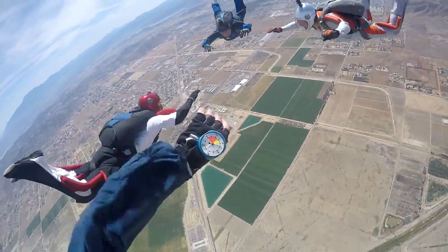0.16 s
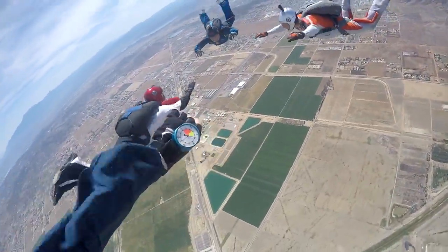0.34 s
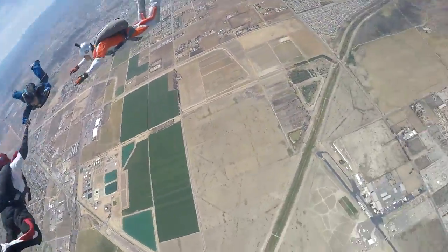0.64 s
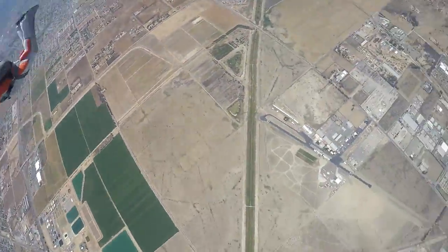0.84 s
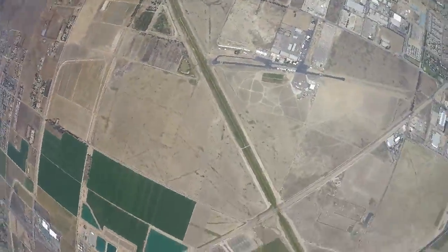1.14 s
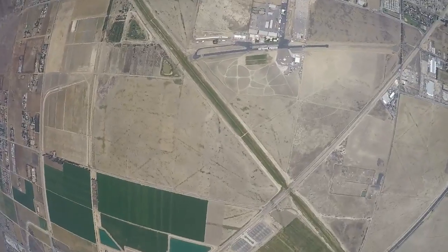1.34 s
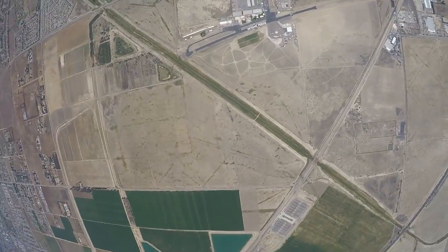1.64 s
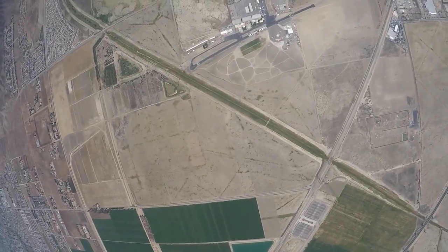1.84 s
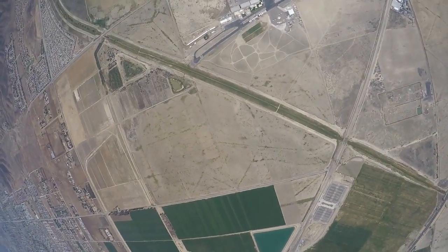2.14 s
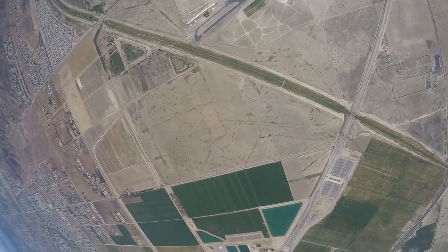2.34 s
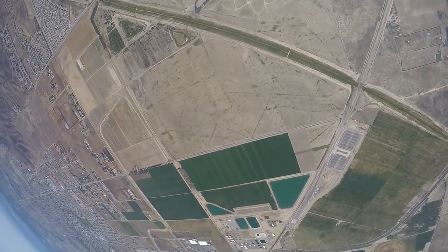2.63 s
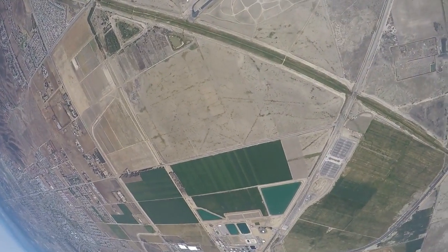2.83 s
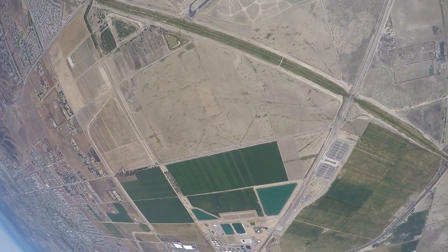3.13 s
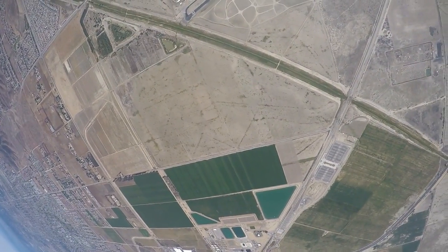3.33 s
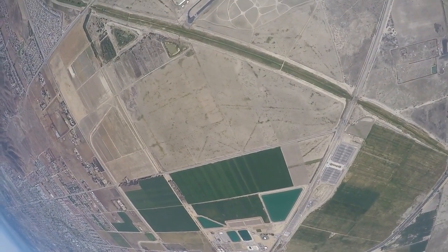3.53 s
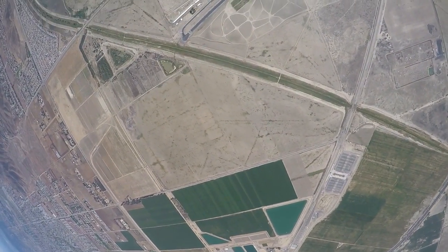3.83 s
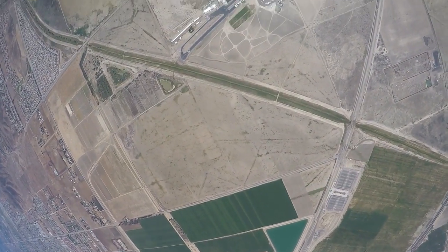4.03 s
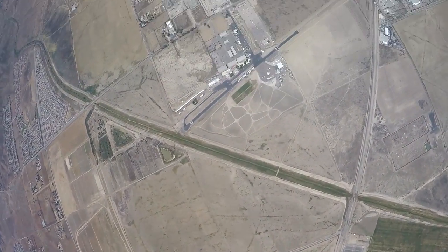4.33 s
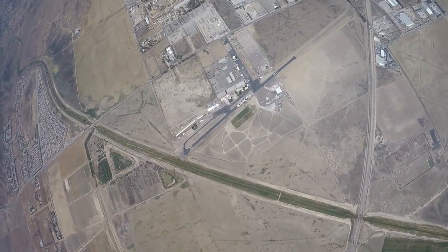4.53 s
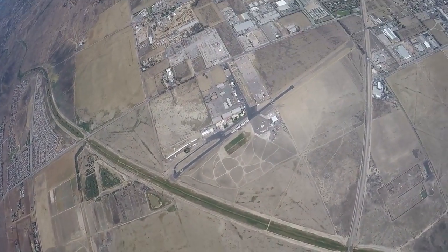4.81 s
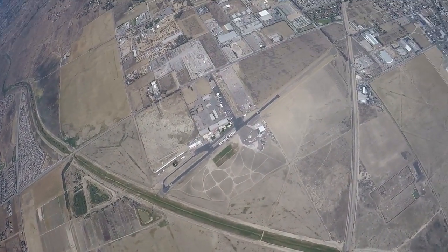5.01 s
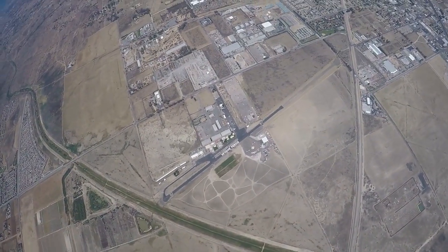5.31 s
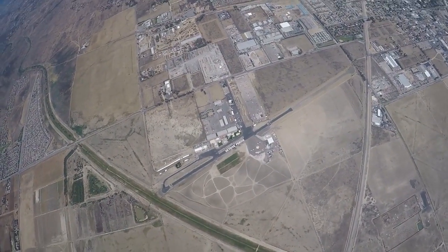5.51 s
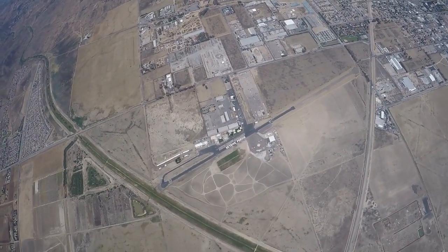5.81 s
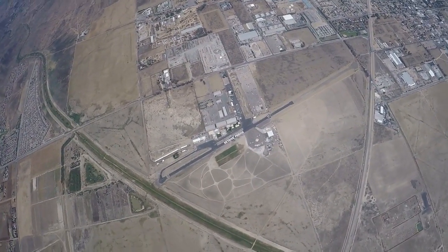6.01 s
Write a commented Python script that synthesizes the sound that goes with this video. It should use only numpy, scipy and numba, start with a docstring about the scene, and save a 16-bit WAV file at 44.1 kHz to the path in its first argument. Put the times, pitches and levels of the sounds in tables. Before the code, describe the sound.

Free-fall wind, heard from a microphone on a skydiver's helmet, starts rough and gusty and settles into a continuous rush. Low rumble and thudding swell and fade beneath an airy, whistling whine that sinks slightly in pitch, with bright hiss on top. A faint thin whistle slips by early, and one short low slap of air hits the microphone just before the end.

```python
"""Free fall from a helmet camera

Air tears past. Big eddies buffet the microphone port under a dull roar. The flow sings in two cavities
of the housing, the lower one sinking as the head tips, and a fine hiss takes its colour from the
housing's higher modes. A thin edge tone slips by early on; near the end one eddy slaps the port."""
import sys
import numpy as np
from scipy import signal
from scipy.fft import rfft, irfft, next_fast_len
from scipy.io import wavfile
from numba import njit

SR = 44100
rng = np.random.default_rng(int(sys.argv[2]) if len(sys.argv) > 2 else 0)


def put_to_file(sound):
    """Save the sound as 16-bit audio at rate SR, in the file named by the first command-line argument."""
    columns = np.atleast_2d(sound).T  # one column per channel
    safe = np.clip(columns, -1, 1)
    whole_steps = np.round(safe * 32767)
    wavfile.write(sys.argv[1], SR, whole_steps.astype(np.int16))


N = 271656

# how unsteady the flow is, wild in another body's wake: (time [s], gust depth [dB])
GUST_DEPTH = [(0, 3.5), (.6, 1.5), (.95, 1.5), (1.3, 0.9), (4.6, 0.46), (4.8, 1.7), (6.16, 0.7)]
# buffet on the port: (time [s], rumble level [dB], thud level [dB])
BUFFET_LEVELS = [(0, -14.5, -20), (.72, -19, -17), (1.2, -18.5, -22), (1.49, -13.5, -19), (1.8, -24, -21.5),
                 (2.25, -23.5, -24), (2.65, -26, -26), (2.95, -19.5, -23), (3.55, -17.5, -20.5),
                 (3.97, -21, -22.5), (4.32, -16.5, -21), (4.71, -19, -22.5), (4.9, -25, -31.5),
                 (5.3, -16, -17.5), (5.58, -20.5, -23.5), (5.86, -18, -17), (6.16, -19.5, -20.5)]
# colours of the eddies, deepest first: (frequency [Hz], relative level [dB])
RUMBLE_COLOUR = [(10, -21), (20, -5), (32, 2.5), (52, 3.5), (68, 1), (100, -13)]
THUD_COLOUR = [(50, -23), (80, -0.5), (130, -3), (165, -12.5), (230, -24.5)]
GROWL_COLOUR = [(130, -9), (180, -1), (250, -2), (350, -7), (550, -15.5)]
ROAR_COLOUR = [(280, -12), (420, -3.5), (650, -1), (850, 0), (1150, 2.5), (1400, -2), (2300, -7.5),
               (3600, -40), (5000, -33)]
# the port slips into the helmet's lee and the roar ducks: (start [s], end [s], gain [dB])
LEE_DIPS = [(.65, 1.36, -3.5), (4.52, 5.8, -4.5), (4.74, 5.2, -1.5)]
# short bursts of roar: (start [s], end [s], gain [dB])
ROAR_BURSTS = [(0, .67, 1.5), (.5, .59, 2.5), (1.33, 1.55, 1), (3.0, 3.17, 1), (4.0, 4.5, 0.5),
               (6.05, 6.3, -1)]
# how hard the cavities ring: (time [s], lower ring [dB], upper rings [dB], upper shoulder [dB])
RING_LEVELS = [(0, -25.5, -23, -32), (.3, -23, -17.5, -24), (.5, -24.5, -21, -31.5),
               (1.0, -25.5, -22.5, -32), (1.2, -23, -20.5, -34), (1.33, -21.5, -18.5, -33),
               (1.7, -22.5, -19, -27), (2.25, -20, -20, -27.5), (2.7, -22.5, -21.5, -35),
               (3.1, -21, -21, -32.5), (3.9, -20.5, -20.5, -34), (4.29, -17, -18.5, -28.5),
               (4.6, -23, -16.5, -29), (4.78, -23, -20.5, -29), (4.9, -21, -21, -30),
               (5.1, -22, -19.5, -28), (5.3, -19.5, -19, -27.5), (5.82, -22, -19, -26.5),
               (5.97, -21.5, -21, -26.5), (6.16, -21, -22, -30)]
# the lower ring sinks as the head tips: (time [s], pitch [Hz])
LOW_RING_PITCH = [(0, 2050), (1.2, 2060), (2.0, 1980), (3.5, 1980), (4.3, 1950), (5.0, 1950), (6.16, 1950)]
# the upper cavity catches or drops out: (start [s], end [s], ring gain [dB], shoulder gain [dB])
CAVITY_CATCHES = [(.04, .1, 3, 2), (.145, .175, -4, -1), (.335, .352, -8, -4), (.445, .5, -3, 0),
                  (.6, .645, 0, 9), (.79, .822, -3, -11), (.822, .92, 2, 3.5), (1.037, 1.2, 3.5, 10),
                  (1.2, 1.45, 4, 8), (1.55, 1.65, 1, 4.5), (4.68, 4.8, -4, -1), (4.722, 4.74, 2, 7),
                  (5.915, 6.08, 4.5, 4)]
# fader ride of the fine hiss: (time [s], level [dB])
HISS_RIDE = [(0, -39.5), (.7, -38), (.92, -34.5), (1.2, -34), (2.0, -31.5), (2.6, -33.5), (3.2, -32),
             (4.2, -31), (4.41, -31.5), (4.6, -33.5), (4.9, -37.5), (5.3, -36.5), (6.03, -37),
             (6.12, -33.5), (6.16, -33)]
# the hiss jumps as the flow reattaches: (start [s], end [s], coarse [dB], sizzle [dB], fine [dB])
HISS_PUFFS = [(.22, .3, 5, 1.5, 0), (.48, .66, 7, -2, .5), (.66, 1.23, -3, -1, 0.5),
              (.76, .82, -3, -3, -0.5), (1.23, 2.013, 1.5, 4.5, 1), (2.013, 2.4, 0, 2.5, -0.7),
              (4.3, 4.94, 2, 3.5, 0), (4.37, 4.46, 3, 1.5, 2), (4.75, 4.94, 3, -0.5, 0),
              (5.442, 5.525, 7, 5, 3)]
# colours of the three hiss layers: (frequency [Hz], relative level [dB])
COARSE_HISS = [(3500, -24), (4150, 0), (4600, 2.5), (4900, -1.5), (5600, -11)]
SIZZLE_HISS = [(4300, -18), (4850, -1.5), (5500, -2), (6200, -11), (7500, -18)]
FINE_HISS = [(5000, -21), (6300, -2), (7500, -5.5), (10000, -6.5), (13000, -11), (14000, -13.5),
             (16000, -16)]
# the housing's peaks and dips on the hiss: (centre [Hz], width [Hz], gain [dB])
HOUSING_MODES = [(4410, 250, 5), (5160, 330, 7), (6360, 580, -1.5), (6990, 1200, 6), (8540, 560, -3),
                 (9300, 1200, 3.5), (13000, 1000, 3.5)]
# a brief thin whistle: (time [s], pitch [Hz], level [dB])
EDGE_TONE = [(.59, 10550, -70), (.605, 10520, -46), (.655, 10420, -46), (.68, 10280, -53),
             (.70, 10250, -70)]
# an eddy hits the port: (time [s], level the decay starts from [dB], final pitch [Hz], t60 [s])
PORT_SLAP = [(5.8405, 6, 98, 0.053)]

LEE_EDGE_S = 0.13


def from_db(db):
    """Decibels to gain."""
    return 10 ** (np.asarray(db) / 20)


def rms_one(x):
    """Scale to rms 1."""
    return x / np.sqrt(np.mean(x ** 2) + 1e-20)


def curves(rows):
    """One automation curve per value column, at every sample."""
    times, *columns = np.transpose(rows)
    return [np.interp(np.arange(N) / SR, times, column) for column in columns]


def spells(rows, edge_s):
    """Columns of decibels added between each start and end, with ramps of edge_s."""
    t = np.arange(N) / SR
    return sum(np.outer(db, np.clip(np.minimum(t - start, end - t) / edge_s + .5, 0, 1))
               for start, end, *db in rows)


def drift(rate_hz):
    """A slow random wobble of rms about 1: noise low-passed twice at rate_hz."""
    hop, run_in = 40, 2000
    pole = np.exp(-2 * np.pi * hop * rate_hz / SR)
    slow = signal.lfilter([1], [1, -2 * pole, pole * pole], rng.standard_normal(N // hop + run_in + 2))
    slow = rms_one(slow[run_in:])
    return np.interp(np.arange(N) / hop, np.arange(len(slow)), slow)


def bands(colour, modes):
    """Coloured noise of rms 1, split into overlapping half-octave bands."""
    size = next_fast_len(N)
    hz = np.maximum(np.arange(size // 2 + 1) * SR / size, 1)
    colour_hz, colour_db = np.transpose(colour)
    db = np.interp(np.log(hz), np.log(colour_hz), colour_db, left=-90, right=-90)
    for centre_hz, width_hz, gain_db in modes:
        db += gain_db / (1 + (2 * (hz - centre_hz) / width_hz) ** 2)
    spectrum = rfft(rng.standard_normal(size)) * from_db(db)
    spectrum /= np.std(irfft(spectrum, size))
    steps = np.arange(np.floor(2 * np.log2(colour_hz[0])), np.ceil(2 * np.log2(colour_hz[-1])) + 1)
    return [irfft(spectrum * np.clip(1 - abs(2 * np.log2(hz) - k), 0, 1), size)[:N] for k in steps]


def turbulence(colour, flutter_db, swell_db, rate_hz, modes=()):
    """Coloured noise whose bands follow a shared flutter and also swell on their own."""
    return sum(from_db(flutter_db + swell_db * drift(rate_hz)) * band for band in bands(colour, modes))


@njit
def resonate(x, hz, width_hz):
    """A two-pole resonance whose centre can slide."""
    out, r = np.zeros(len(x)), np.exp(-np.pi * width_hz / SR)
    for i in range(2, len(x)):
        feedback = 2 * r * np.cos(2 * np.pi * hz[i] / SR)
        out[i] = x[i] - x[i - 2] + feedback * out[i - 1] - r * r * out[i - 2]
    return out


def sing(hz, width_hz):
    """A breathy tone of rms 1: noise twice through a resonance, for steep skirts."""
    hz = hz + np.zeros(N)
    once = resonate(rng.standard_normal(N), hz, width_hz)
    return rms_one(resonate(once, hz, width_hz))


def eddies(gust_db):
    """Large eddies press on the port in lumps, from deep rumble up to a dull roar."""
    rumble_db, thud_db = curves(BUFFET_LEVELS)
    lee_db = spells(LEE_DIPS, LEE_EDGE_S)[0]
    burst_db = spells(ROAR_BURSTS, edge_s=0.038)[0]
    roar_db = -26 + lee_db + burst_db
    # the growl swells with the thudding, ducks less in the lee and bursts harder than the roar
    growl_db = -29.5 + 0.37 * (thud_db - thud_db.mean()) + 0.48 * lee_db + 2 * burst_db
    return (from_db(rumble_db) * turbulence(RUMBLE_COLOUR, 0, swell_db=0.8, rate_hz=3.5)
            + from_db(thud_db) * turbulence(THUD_COLOUR, 0, swell_db=1, rate_hz=12)
            + from_db(growl_db) * turbulence(GROWL_COLOUR, 0.41 * gust_db, swell_db=2.1, rate_hz=17)
            + from_db(roar_db) * turbulence(ROAR_COLOUR, 0.98 * gust_db, swell_db=0.6, rate_hz=5.4))


def cavities(gust_db):
    """Shear noise rings in two hollows of the housing, each with a shoulder of noise beside its ring."""
    low_db, high_db, over_db = curves(RING_LEVELS)
    catch_db, over_catch_db = spells(CAVITY_CATCHES, edge_s=0.008)
    under_db = low_db - 3.5 + 0.68 * spells(LEE_DIPS, LEE_EDGE_S)[0]
    low_ring = from_db(low_db) * sing(curves(LOW_RING_PITCH)[0], width_hz=450)
    low_shoulder = from_db(under_db) * sing(1600, width_hz=500)
    pair = rms_one(sing(2980, width_hz=700) + from_db(-3.5) * sing(2520, width_hz=450))
    high_rings = from_db(high_db + catch_db) * pair
    high_shoulder = from_db(over_db + over_catch_db) * sing(3600, width_hz=800)
    return (from_db(0.56 * gust_db + 0.58 * drift(7.7)) * (low_ring + low_shoulder)
            + from_db(0.94 * gust_db + 0.32 * drift(10.5)) * (high_rings + high_shoulder))


def hiss(gust_db):
    """Fine turbulence through the housing modes; its three layers flutter as one sheet."""
    ride_db = curves(HISS_RIDE)[0]
    swing_db = ride_db + 34  # the ride around its middle level
    coarse_puff_db, sizzle_puff_db, fine_puff_db = spells(HISS_PUFFS, edge_s=0.012)
    flutter_db = 0.58 * gust_db + 0.22 * drift(8.1)
    coarse = turbulence(COARSE_HISS, flutter_db, swell_db=0.9, rate_hz=17, modes=HOUSING_MODES)
    sizzle = turbulence(SIZZLE_HISS, flutter_db, swell_db=0.62, rate_hz=7.3, modes=HOUSING_MODES)
    fine = turbulence(FINE_HISS, flutter_db, swell_db=0.5, rate_hz=7.8, modes=HOUSING_MODES)
    return (from_db(-34.5 + swing_db + coarse_puff_db) * coarse
            + from_db(-34 + 0.87 * swing_db + sizzle_puff_db) * sizzle
            + from_db(ride_db + fine_puff_db) * fine)


def whistle():
    """An edge tone that comes and goes while the head turns."""
    hz, level_db = curves(EDGE_TONE)
    return from_db(level_db) * sing(hz, width_hz=120)


def slap():
    """One eddy slaps the port: a sudden swing of pressure whose pitch sags within one cycle."""
    out = np.zeros(N)
    for start, level_db, hz, t60 in PORT_SLAP:
        t = np.maximum(np.arange(N) / SR - start, 0)
        cycles = hz * (t + 0.0064 * (1 - np.exp(-t / 0.0022)))
        attack = 1 - np.exp(-t / 0.0039)
        out += from_db(level_db - 60 * t / t60) * attack * np.sin(2 * np.pi * cycles)
    return out


def scene():
    """The mono mix: one gust signal shakes growl, roar, cavities and hiss together."""
    gust_db = curves(GUST_DEPTH)[0] * rms_one(0.25 * drift(8.9) + drift(45))
    return (eddies(gust_db) + cavities(gust_db) + hiss(gust_db) + whistle() + slap())[None]


def record(dry):
    """Soft saturation rounds the peaks, then a steep low-pass shaves off the top."""
    rounded = 1.4 * np.tanh(dry / 1.4)
    low_pass = signal.ellip(14, .5, 90, 15290, fs=SR, output="sos")
    return signal.sosfilt(low_pass, rounded)


dry = scene()
out = record(dry)
put_to_file(out)
```